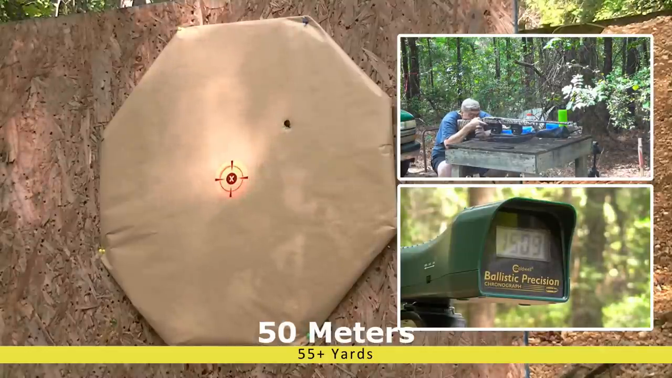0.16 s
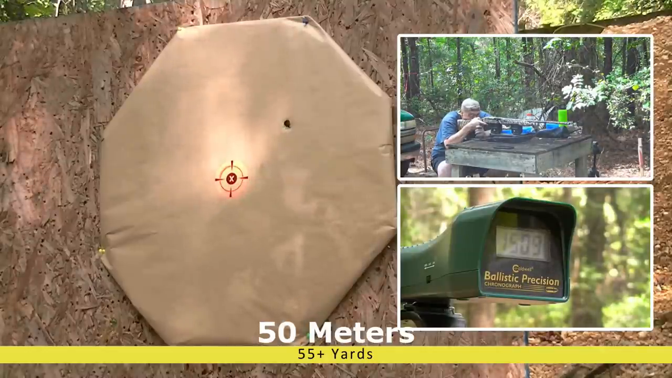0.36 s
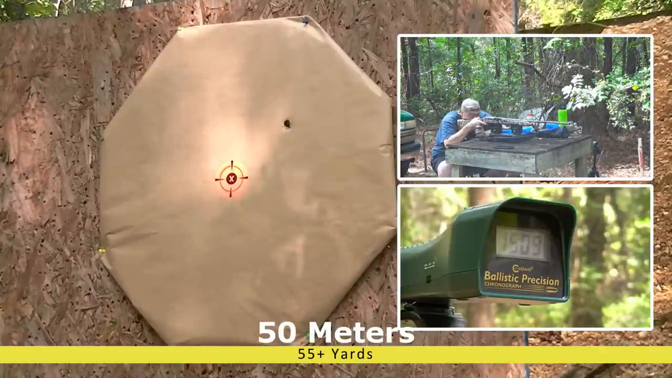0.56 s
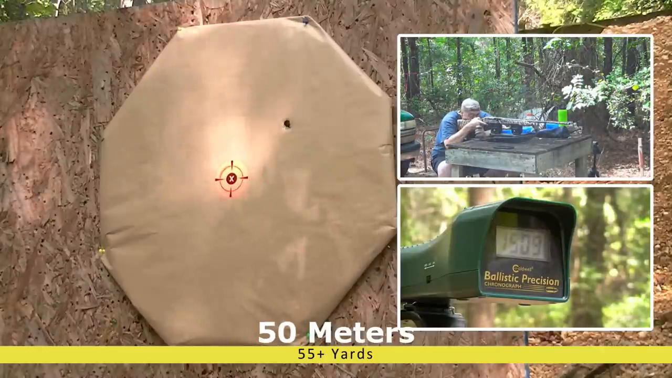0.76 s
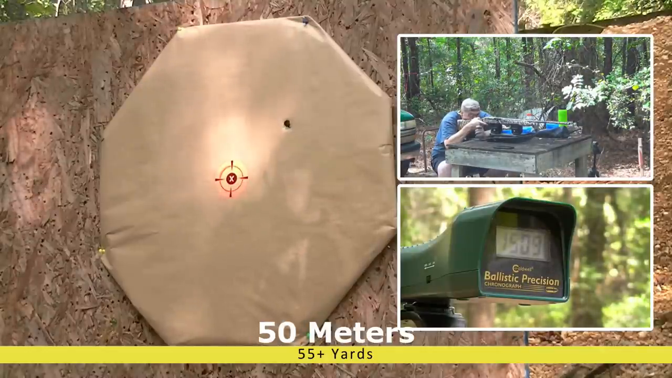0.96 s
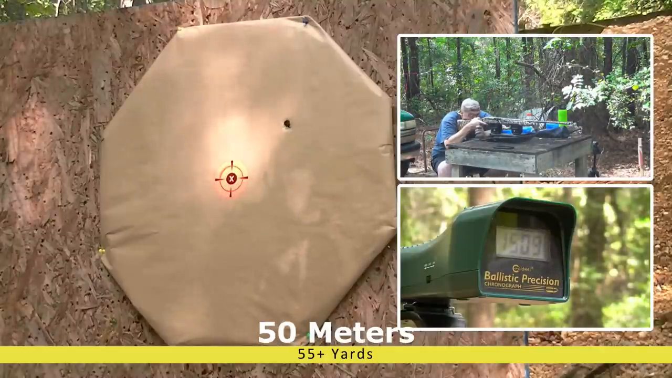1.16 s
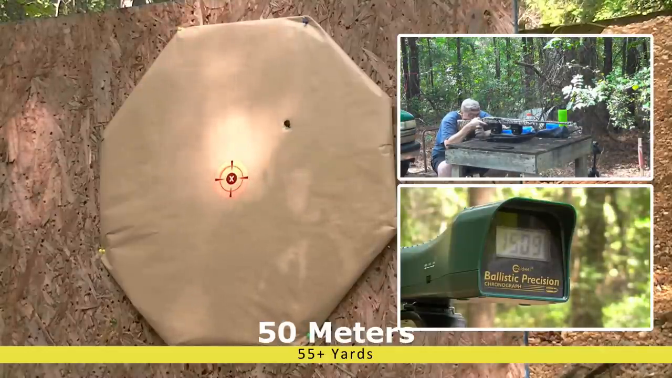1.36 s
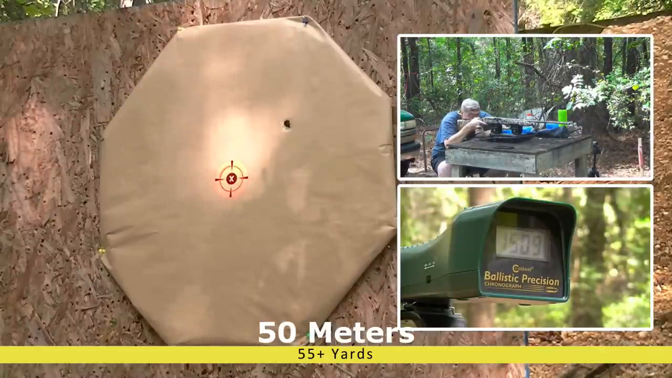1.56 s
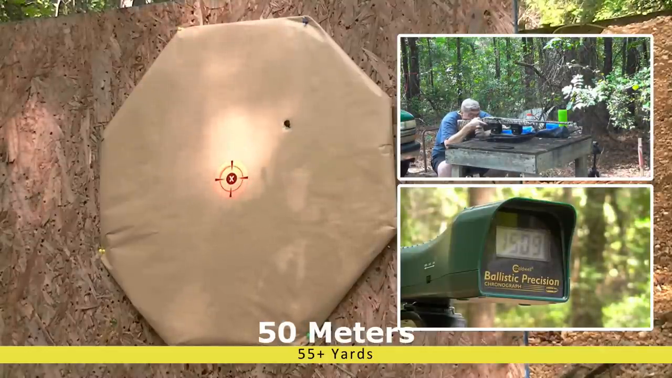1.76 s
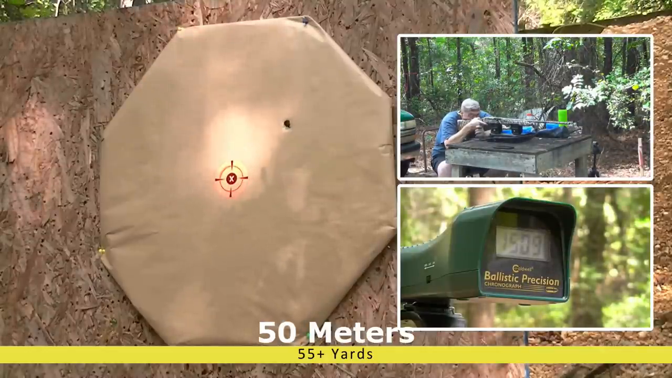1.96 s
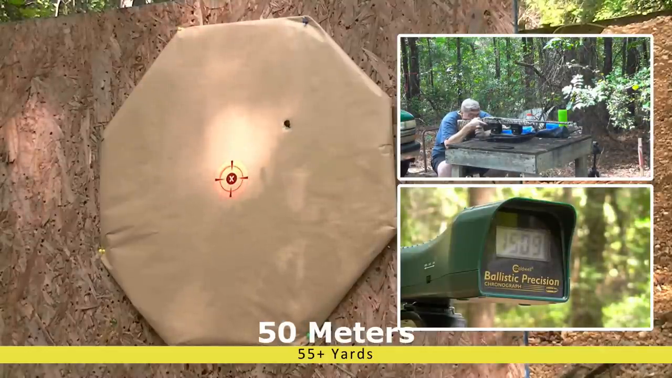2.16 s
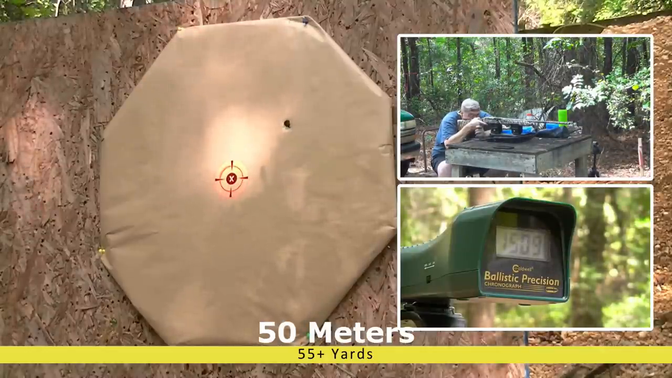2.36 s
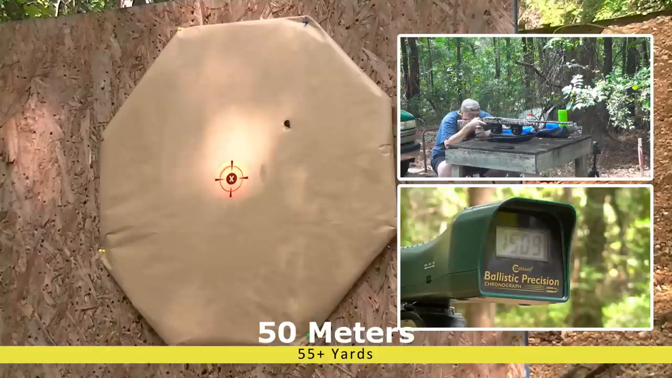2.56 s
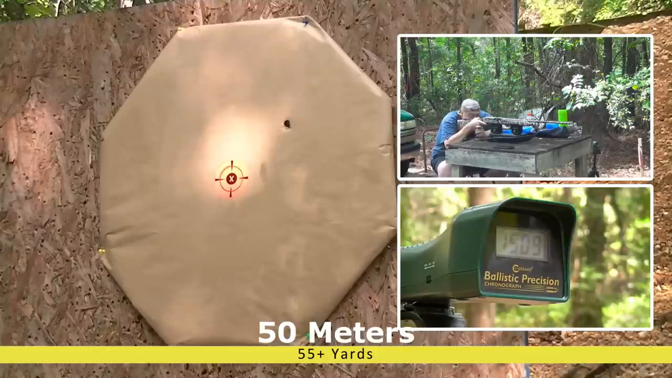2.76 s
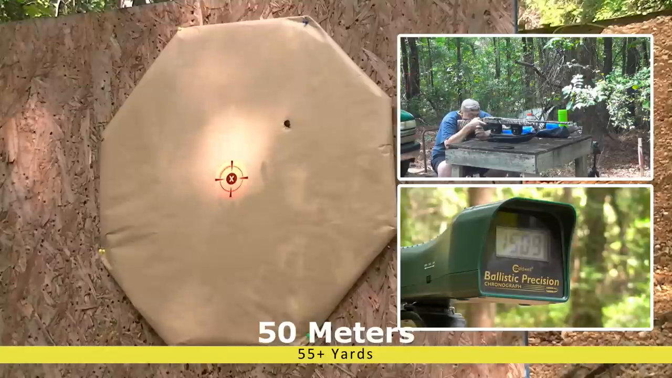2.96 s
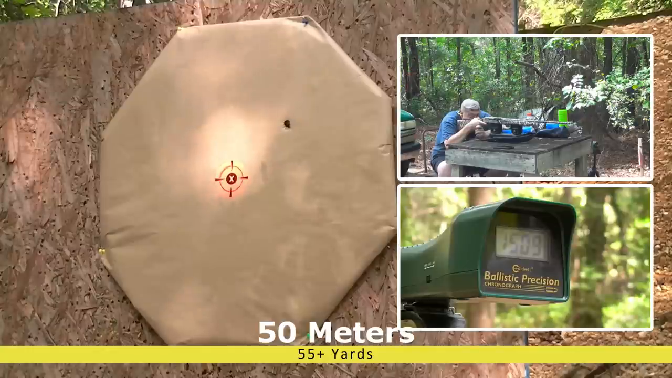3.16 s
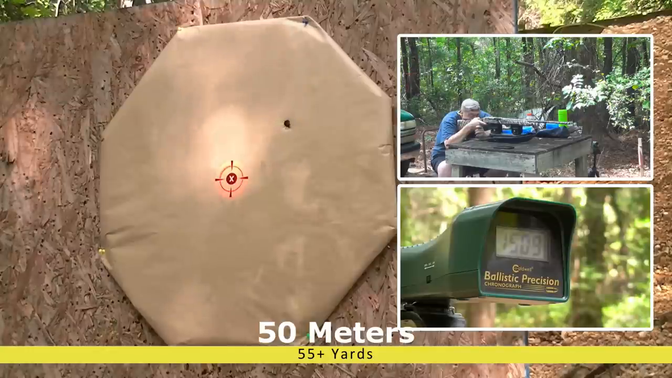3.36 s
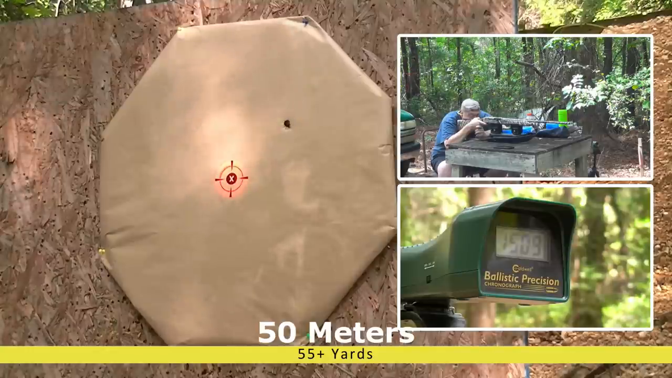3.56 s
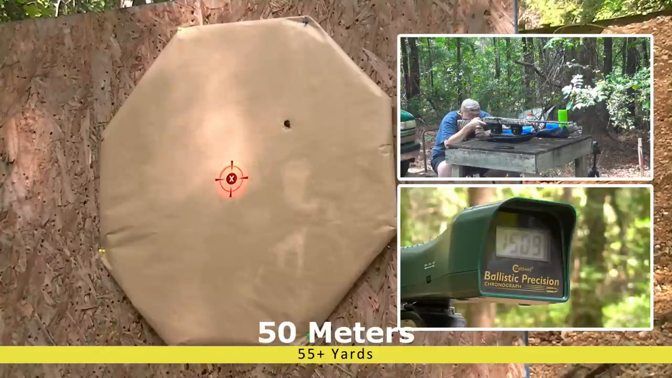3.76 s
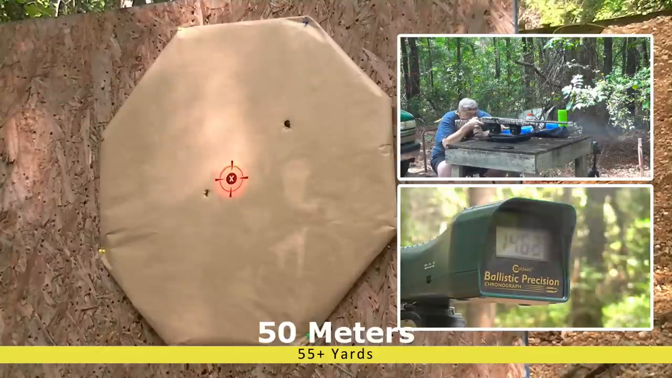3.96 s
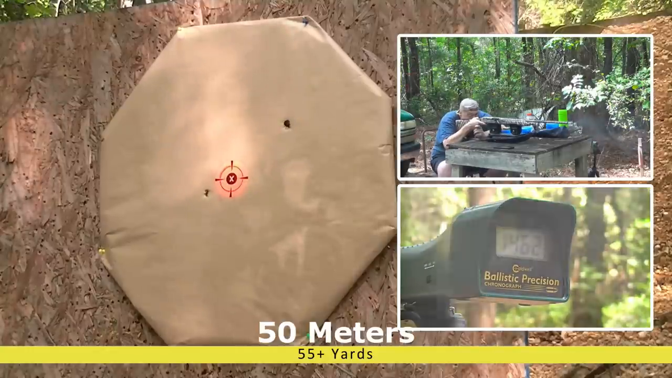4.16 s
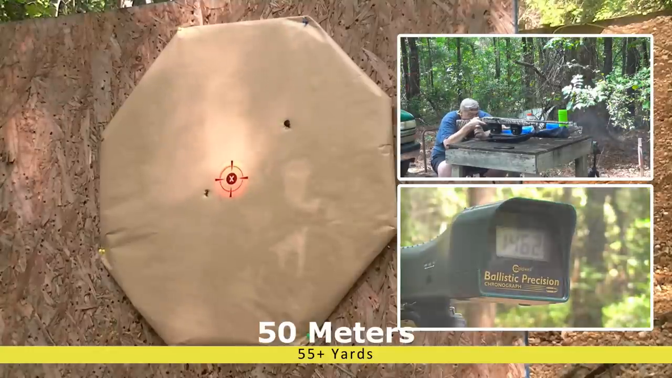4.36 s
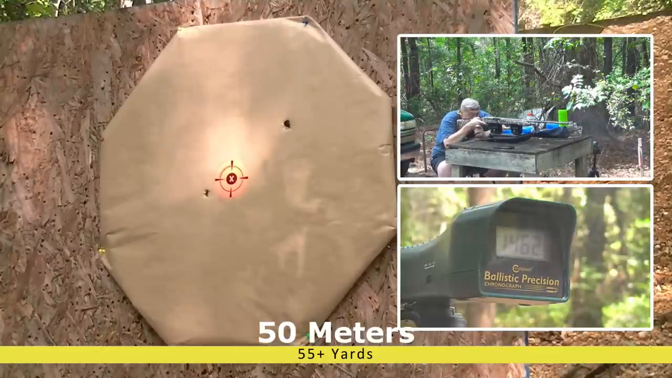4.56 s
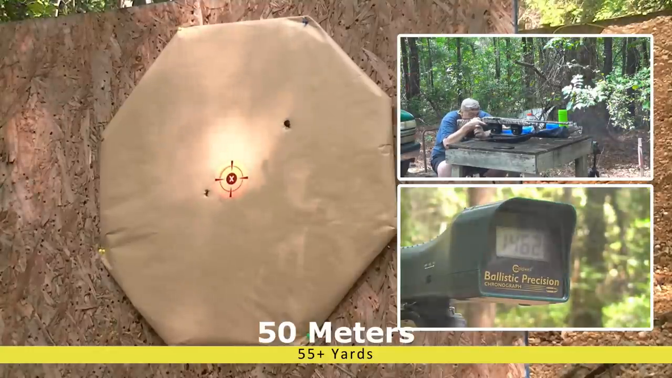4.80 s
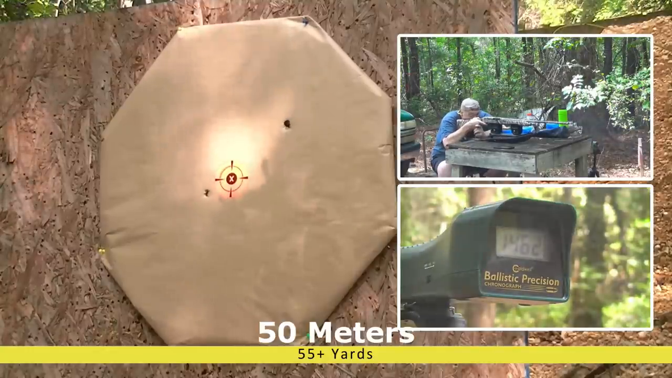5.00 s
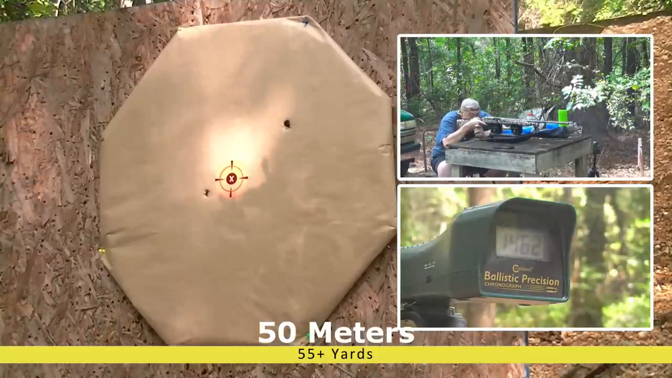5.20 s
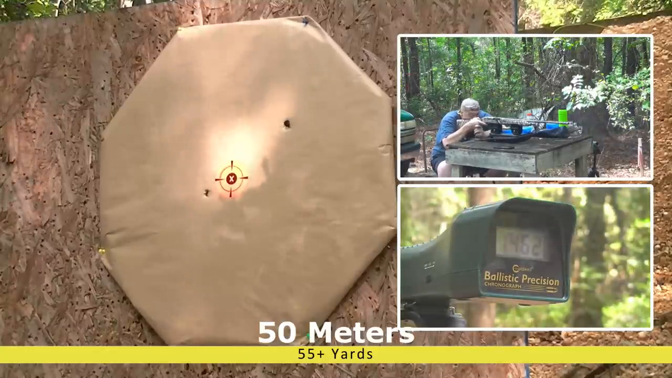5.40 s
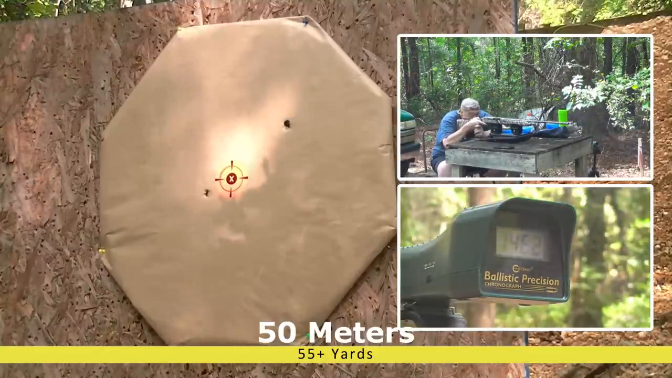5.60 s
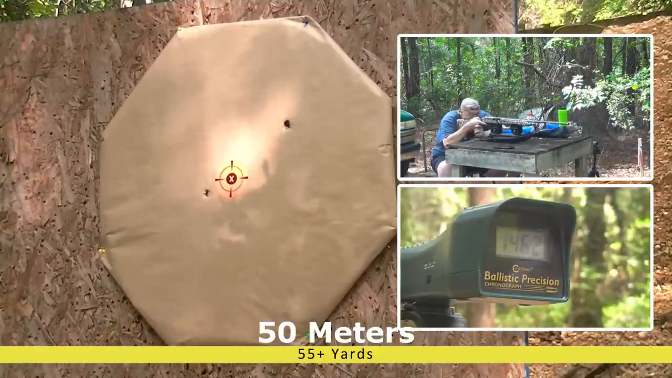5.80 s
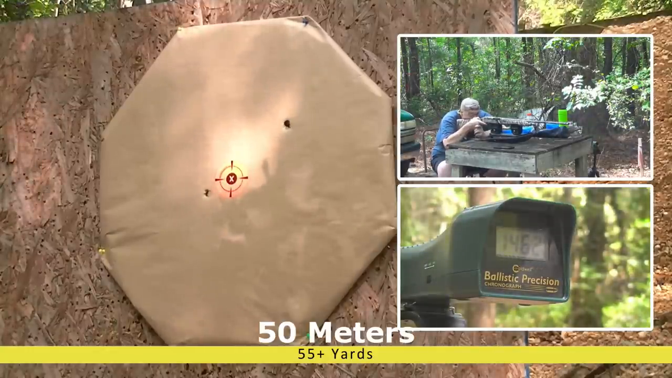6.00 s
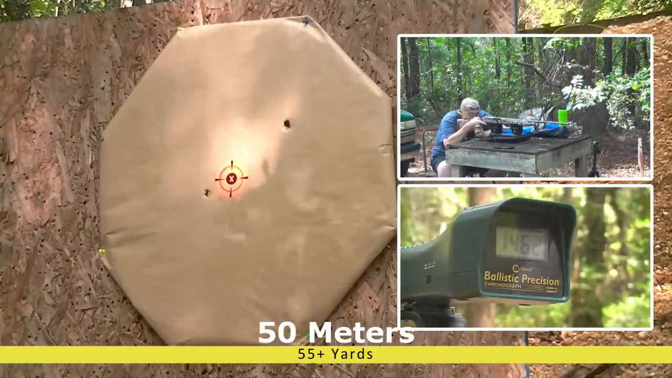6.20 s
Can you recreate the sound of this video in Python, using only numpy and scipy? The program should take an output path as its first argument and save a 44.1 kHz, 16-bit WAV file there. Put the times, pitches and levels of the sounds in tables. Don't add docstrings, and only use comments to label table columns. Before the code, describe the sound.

Outdoors at a wooden bench in a wood, a soft low wash and faint far machine hum lie under cloth rustles, tiny ticks and dull knocks. After nearly four seconds one shotgun fires close to a small stereo recorder, a thin crack leading a clipped blast. Tree echoes swell into a roar, darken and fade; the background returns quieter, with thin rustles and sparse ticks.

```python
import sys
import numpy as np
from scipy import signal
from scipy.io import wavfile
from scipy.ndimage import uniform_filter1d

SR = 44100
rng = np.random.default_rng(int(sys.argv[2]) if len(sys.argv) > 2 else 0)


def unload_wav(signal):
    wavfile.write(
        sys.argv[1],
        SR,
        np.round(np.clip(np.atleast_2d(signal).T, -1, 1) * 32767).astype(np.int16),
    )


def magnitude_from_level(level_db):
    exponent = np.asarray(level_db, float) / 20
    return 10 ** exponent


N = 275184

# start_s, length_s, level_db
GAS_BURSTS = [
    (3.8484, .003, -40),
    (3.8516, .0015, -20),
    (3.853, .0048, -30),
    (3.8577, .0064, -12),
]
# frequency_hz, density_db_per_hz
GAS_COLOUR = [(59, -35), (100, -12.5), (1120, -7.5), (1750, 5), (3700, -9), (5100, -6.5), (5790, -7.5),
              (6580, -5), (11700, -3.5), (15500, -19.5), (16500, -32)]
# time_s, level_db, length_s, left_over_right_db
PULSES = [(3.8633, -15.5, 0.00034, -10.5), (3.8641, -6.5, 0.00041, 13), (3.865, -8, 0.00016, -8),
          (3.867, -7, 0.00056, 3), (3.8693, -11, 0.00016, -3), (3.8746, -8, 0.00027, 4),
          (3.8764, -15, 0.0003, 6), (3.8797, -20, 0.00023, -5.5), (3.8867, -17, 0.0002004, -7),
          (3.888, -20, .0003, -6.5), (3.896, -19, 0.000288, 0.5)]
SHOT_S = 3.86

# frequency_hz, density_db_per_hz
ROAR_COLOUR = [(20, -47), (40, -19), (110, -17.5), (175, -6), (300, -12), (500, -8.5), (800, -5),
               (1250, -3.5), (2300, -13), (3400, -10.5), (5000, -16.5), (7800, -22.5), (10500, -19.5),
               (15500, -35.5)]
# frequency_hz, likeness
ROAR_LIKENESS = [(60, 0.93), (150, 0.95), (380, 0.97), (950, 0.67), (2400, 0.4), (6000, 0.6), (9000, 0.9),
                 (12500, .995)]
# frequency_hz, factor
TREBLE_SHARE = [(250, -0.21), (450, -0.0767), (900, 0), (1400, 0.22), (2200, 0.24), (4000, 0.87),
                (6000, 1.17), (8000, 1.6), (11000, 2.5), (13000, 2.5), (16000, 4.5)]
# frequency_hz, factor
BASS_SHARE = [(60, 0.99), (200, 1.03), (350, 0.31), (600, 0)]
# time_s, width_s, level_db, treble_db
STANDS = [
    (3.935, .02, 1, 1),
    (4.01, .02, 0.5, 0),
    (4.055, .025, 2.5, -0.5),
    (4.1, 0.0068, -2.5, 0.5),
    (4.135, 0.035, -0.5, 2),
    (4.175, 0.027, 0.5, 0.5),
    (4.24, 0.035, 1.5, 1),
    (4.29, 0.053, -1.5, 1),
    (4.72, 0.2, 0, -2),
    (4.87, 0.0186, 2.5, -3.5),
]
ROAR_FROM_DB, ROAR_TOP_DB, ROAR_SWELL_S = -22.5, -18, 0.44
NEAR_FALL, FAR_DB, FAR_FALL = 27.1, -34.5, 7.97
AIR_FROM_DB, AIR_DB_PER_S = 2.5, -24
GROUND_FROM_DB, GROUND_TO_DB, GROUND_S = 5, -22, 0.25
BOOM_HZ, BOOM_LATE_DB, BOOM_S = 950, -7.5, 0.033
LEAN_DB, LEAN_S = -2.97, 0.7

# time_s, peak_db, pitch_hz
TICKS = [(0.034, -46, 7640), (0.0944, -50, 10300), (0.3994, -46.5, 8890), (0.5494, -53, 8700),
         (0.8595, -42, 7170), (1.0224, -55, 5640), (1.2246, -44, 10600), (1.2364, -50.5, 7540),
         (1.2825, -46, 7900), (1.3169, -52.5, 5630), (1.3753, -47, 6650), (1.7294, -46.5, 7330),
         (2.5594, -50, 6920), (2.6249, -44, 6240), (2.9194, -46, 5850), (2.9474, -50.5, 8000),
         (3.033, -38.5, 5930), (3.1276, -41, 8660), (3.1812, -43, 6400)]
# time_s, peak_db, pitch_hz, t60_s
LATE_TICKS = [(4.461, -34.5, 13400, .05), (4.678, -57, 13500, 0.017), (4.72, -56, 12500, .015),
              (4.9365, -35.5, 13340, .067), (4.936, -41, 7500, .06), (5.1354, -48, 8000, .03),
              (5.474, -43, 6900, 0.022), (5.5847, -58, 10400, .03), (5.684, -43, 12000, 0.017),
              (5.734, -52, 12000, .03), (5.7704, -53, 13000, .02), (5.883, -58, 12500, .02),
              (6.048, -58, 11000, .02), (6.1734, -52, 13800, .03), (6.2135, -47.5, 6960, .051)]
# time_s, peak_db, pitch_hz
KNOCKS = [(0.093, -61, 405), (0.4, -43, 1300), (.55, -43, 1690), (.895, -48, 3000), (.935, -44, 1600),
          (.948, -49, 2200), (.985, -51, 1100), (1.023, -46, 895), (1.234, -49, 293), (2.5, -46, 1800),
          (2.565, -40, 3200), (2.86, -50, 3000), (2.865, -44, 1150), (2.875, -45, 1080), (2.898, -44, 2300),
          (2.919, -36, 2390), (2.947, -40, 2000), (3.129, -42, 2310), (5.37, -52, 4800)]
TICK_T60_S, TICK_WIDTH_HZ, LATE_WIDTH_HZ = 0.01, 4300, 4900

# start_s, hold_s, hiss_db, body_over_hiss_db
RUSTLES = [(.04, 1.13, -69, -8), (.092, .03, -63.5, -2), (.404, .004, -54, 0), (.55, 0.044, -66, 1),
           (.8, .03, -68, -5), (.865, .02, -56.5, -5), (.934, .01, -56, 4.5), (.97, 0.055, -62, 6.5),
           (1.15, 0.044, -66, 4), (2.495, .01, -58, 3.5), (2.53, 0.033, -60, 1.5), (2.856, .03, -54.5, -1),
           (2.895, 0.032, -51, 0)]
# start_s, hold_s, hiss_db, body_over_hiss_db
LATE_RUSTLES = [(4.97, 1.26, -73.5, -13), (5.132, .115, -59.5, -6), (5.35, .035, -59.5, -12),
                (5.3, .03, -67, -9), (5.41, 0.045, -65, -4), (5.474, .056, -61.5, -7),
                (5.586, .004, -71, -5), (5.636, 0.056, -67, -8), (6.05, .05, -68, -12),
                (6.14, 0.048, -60.5, -14), (6.235, .01, -64, -3)]
# frequency_hz, density_db_per_hz
FULL_HISS = [(2350, -39), (4000, -10), (5380, -1.5), (5830, -2.5), (9890, -3.5), (12500, -10), (15100, -22),
             (16000, -21)]
# frequency_hz, density_db_per_hz
THIN_HISS = [(2350, -35), (4000, -3), (4680, -3), (8450, -4.5), (11800, 2), (14200, -5), (16000, -16)]
# frequency_hz, density_db_per_hz
CLOTH_BODY = [(500, -30), (1000, -5), (1600, -5.5), (2400, -4.5), (3300, -7.5), (5000, -38)]
EARLY_RISE, EARLY_FALL, EARLY_THIN = 210, 290, 0.12
LATE_RISE, LATE_FALL, LATE_THIN = 240, 430, 0.9

# frequency_hz, density_db_per_hz
WASH_COLOUR = [(18, -30), (30, -3.5), (60, -4), (130, -8.5), (270, -10), (480, -7), (900, -10), (1600, -15),
               (3700, -16.5), (6000, -22.5), (8200, -24), (10500, -24), (13000, -28.5), (16000, -30)]
WASH_DB = -52.5
# frequency_hz, likeness
WASH_LIKENESS = [(60, 1.0), (180, 0.97), (550, 0.84), (1650, 0.62), (4970, 0.77), (15000, 0.94)]
# pitch_hz, width_hz, level_db
HUM = [
    (58, 4.4, -65),
    (88, 5.8, -67),
    (238.8, 4, -73),
]
# start_s, hold_s, level_db
DRONE_SWELLS = [
    (.42, .02, -59),
    (1.38, .02, -66),
    (1.85, .02, -61),
    (2.5, .4, -64),
    (3.05, 0.33, -56.5),
    (3.75, 3.4, -62),
]
DRONE_HZ, DRONE_RISE, DRONE_FALL = 124, 49, 24
DIP_DB, DIP_S, LINGER_DB, LINGER_S = -17, 0.48, -9.5, 5.2


def blast():
    likeness = [(500, 0.29), (3000, 1.0), (8000, 0.9), (12000, 0.85)]
    gas = evened(noise(steady(GAS_COLOUR), likeness, size=256, patchy_db=1, flicker_db=1.5))
    out, t = np.zeros((2, N)), np.arange(300) / SR
    for s, length, db in GAS_BURSTS:
        part = gas[:, round(s * SR):round((s + length) * SR)]
        squashed = 2.0 * np.tanh(1.2 * part)
        add(out, s, magnitude_from_level(db) * squashed * signal.windows.tukey(part.shape[1], 0.15))
    for s, db, length, lean_db in PULSES:
        u = t / length
        pulse = (1 - np.exp(-u * 3.2)) * (1.25 - u) * np.exp(-u)
        sides = magnitude_from_level([[lean_db / 2], [-lean_db / 2]])
        add(out, s - length / 2, magnitude_from_level(db) * sides * pulse / pulse.max())
    middle = signal.butter(2, [250, 7000], "band", fs=SR)
    side = signal.lfilter(*middle, out[0] - out[1]) / 2
    return out.mean(0) + np.array([side, -side])


def roar():
    def field(hz, t):
        age = np.maximum(t - SHOT_S, 0)
        stands = sum(db * np.exp(-((t - s) / width) ** 2) for s, width, _, db in STANDS)
        treble = AIR_FROM_DB + AIR_DB_PER_S * age + stands
        bass = GROUND_TO_DB + (GROUND_FROM_DB - GROUND_TO_DB) * np.exp(-age / GROUND_S)
        boom = BOOM_LATE_DB * np.exp(-age / BOOM_S - (np.log((hz + 1) / BOOM_HZ) / 0.45) ** 2)
        return boom + read(ROAR_COLOUR, hz) + read(TREBLE_SHARE, hz) * treble + read(BASS_SHARE, hz) * bass

    echoes = noise(field, ROAR_LIKENESS, size=1024, patchy_db=0.84, flicker_db=0.65)
    core = signal.sosfilt(signal.butter(3, [500, 1500], "band", fs=SR, output="sos"), echoes.mean(0))
    t = np.arange(N) / SR
    echoes *= roar_level(t) / core[t > SHOT_S].std()
    lean = magnitude_from_level(LEAN_DB * np.exp(-np.maximum(t - SHOT_S, 0) / LEAN_S))
    body = signal.lfilter(*signal.butter(1, 250, "high", fs=SR), echoes)
    body = signal.lfilter(*signal.butter(2, 6000, fs=SR), body)
    return echoes + body * np.array([lean - 1, 1 / lean - 1])


def roar_level(t):
    age = np.maximum(t - SHOT_S, 0)
    late = np.maximum(age - ROAR_SWELL_S, 0)
    swell_db = (ROAR_TOP_DB - ROAR_FROM_DB) * np.minimum(age / ROAR_SWELL_S, 1)
    near_db = ROAR_FROM_DB + swell_db - NEAR_FALL * late
    far_db = FAR_DB - FAR_FALL * late
    stands_db = sum(db * np.exp(-((t - s) / width) ** 2) for s, width, db, _ in STANDS)
    return np.hypot(magnitude_from_level(near_db), magnitude_from_level(far_db)) * magnitude_from_level(stands_db) * (t > SHOT_S)


def ticks():
    out, t = np.zeros((2, N)), np.arange(2000) / SR
    rows = [(*row, TICK_T60_S, TICK_WIDTH_HZ) for row in TICKS]
    rows += [(*row, LATE_WIDTH_HZ) for row in LATE_TICKS]
    for s, db, hz, t60, width in rows:
        grit = rng.standard_normal(len(t)) * magnitude_from_level(-60 * t / t60)
        tick = resonate(resonate(grit, hz, width), hz, width)
        add(out, s, magnitude_from_level(db) * tick / abs(tick).max())
    for s, db, hz in KNOCKS:
        add(out, s, magnitude_from_level(db) * np.sin(2 * np.pi * hz * t) * np.exp(-(t * hz - 2.4) ** 2 / 2.4))
    return out


def rustle():
    likeness = [(1000, 0.85), (9000, 0.9)]
    full, thin, body = (evened(noise(steady(colour), likeness, size=256, patchy_db=2.0, flicker_db=2.0))
                        for colour in (FULL_HISS, THIN_HISS, CLOTH_BODY))
    out = np.zeros((2, N))
    for rows, rise, fall, share in ((RUSTLES, EARLY_RISE, EARLY_FALL, EARLY_THIN),
                                    (LATE_RUSTLES, LATE_RISE, LATE_FALL, LATE_THIN)):
        s, hold, hiss_db, body_db = np.transpose(rows)
        hiss = np.sqrt(1 - share) * full + np.sqrt(share) * thin
        out += magnitude_from_level(swells(s, hold, hiss_db, rise, fall)) * hiss
        out += magnitude_from_level(swells(s, hold, hiss_db + body_db, rise, fall)) * body
    return out


def wash():
    air = evened(noise(steady(WASH_COLOUR), WASH_LIKENESS, size=2048, patchy_db=1.0, flicker_db=0.18))
    hum = sum(magnitude_from_level(db) * evened(resonate(rng.standard_normal(N), hz, width)) for hz, width, db in HUM)
    tone = np.sin(2 * np.pi * DRONE_HZ * np.arange(N) / SR)
    drone = evened(resonate(1.9 * tone + 30 * rng.standard_normal(N), DRONE_HZ, 3.7))
    drone_db = swells(*np.transpose(DRONE_SWELLS), DRONE_RISE, DRONE_FALL) - 4.0
    return magnitude_from_level(WASH_DB) * air + hum + magnitude_from_level(drone_db) * drone


def steady(colour):
    return lambda hz, t: read(colour, hz) + 0 * t


def noise(field_db, same, size, patchy_db, flicker_db):
    hop = size // 4
    frames, hz = N // hop + 5, np.fft.rfftfreq(size, 1 / SR)
    a, b, c, d, patches = rng.standard_normal((frames, len(hz), 5)).T
    patches = uniform_filter1d(patches, size // 64, 0)
    patches = evened(uniform_filter1d(patches, 3072 // hop, 1))
    flicker = evened(uniform_filter1d(rng.standard_normal(frames), 3))
    like = np.clip(read(same, hz), -1, 1)[:, None]
    left = a + 1j * b
    right = like * left + np.sqrt(1 - like ** 2) * (c + 1j * d)
    level_db = field_db(hz[:, None], np.arange(frames) * hop / SR)
    z = np.array([left, right]) * magnitude_from_level(level_db + patchy_db * patches + flicker_db * flicker)
    return signal.istft(z, nperseg=size, noverlap=size - hop)[1][:, :N]


def resonate(x, hz, width):
    turn = np.exp(2j * np.pi * hz * np.arange(x.shape[-1]) / SR)
    r = np.exp(-np.pi * width / SR)
    return 2 * (turn * signal.lfilter([1 - r], [1, -r], x / turn)).real


def swells(s, hold, db, rise, fall):
    t = np.arange(0, N + 64, 64) / SR
    s, hold, db = (np.reshape(c, (-1, 1)) for c in (s, hold, db))
    level_db = db - rise * np.maximum(s - t, 0) - fall * np.maximum(t - s - hold, 0)
    return np.interp(np.arange(N) / SR, t, level_db.max(0))


def evened(x):
    return x / np.sqrt(np.mean(x ** 2) + 1e-20)


def read(points, hz):
    f, value = np.transpose(points)
    return np.interp(np.log(hz + 1), np.log(f + 1), value)


def add(mix, s, sound):
    part = mix[:, round(s * SR):][:, :sound.shape[-1]]
    part += sound[..., :part.shape[1]]


def scene():
    age = np.arange(N) / SR - SHOT_S
    duck_db = DIP_DB * np.exp(-abs(age) / DIP_S) + LINGER_DB * np.exp(-abs(age) / LINGER_S)
    return blast() + roar() + ticks() + rustle() + magnitude_from_level((age > 0) * duck_db) * wash()


def band_limit(x):
    return signal.sosfilt(signal.butter(12, 16990, fs=SR, output="sos"), x)


def record(dry):
    thin = signal.lfilter(*signal.butter(1, 40, "high", fs=SR), dry)
    squashed = np.tanh(thin * 0.6) / 0.6
    band_edge = signal.firwin(255, 15800, window=("kaiser", 8), fs=SR)
    limited = signal.oaconvolve(squashed, band_edge[None], "same")
    return band_limit(limited)


dry = scene()
out = record(dry)
unload_wav(out)
```